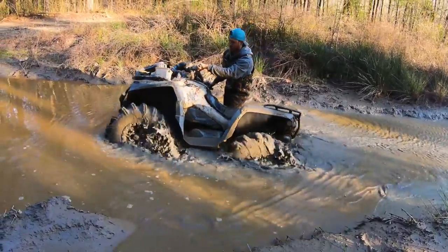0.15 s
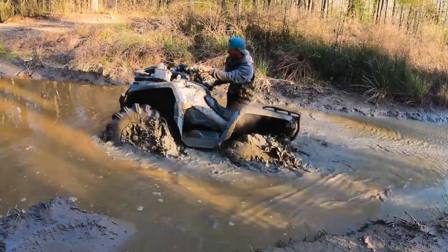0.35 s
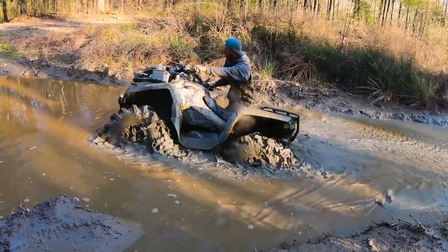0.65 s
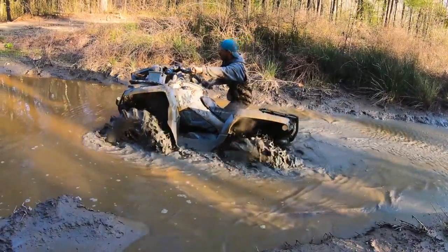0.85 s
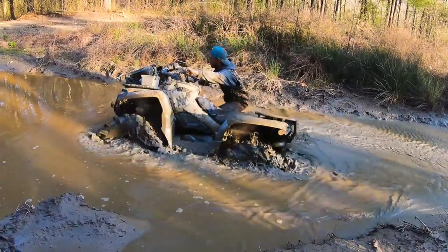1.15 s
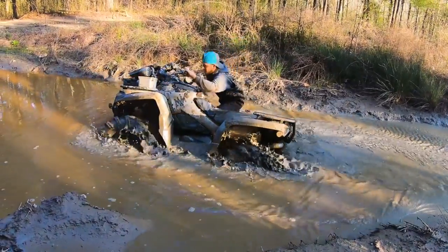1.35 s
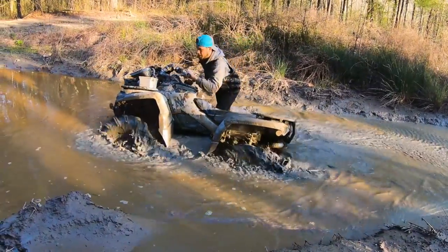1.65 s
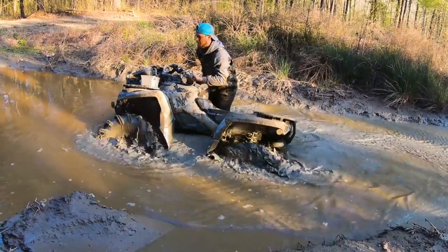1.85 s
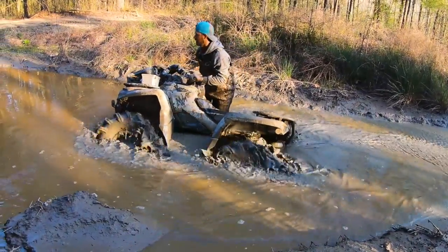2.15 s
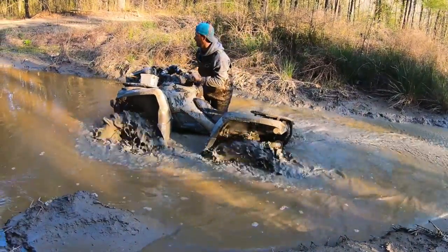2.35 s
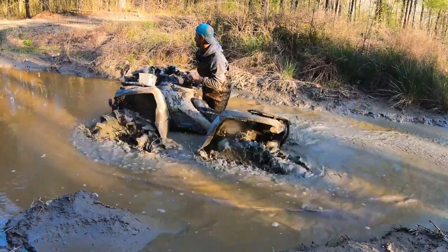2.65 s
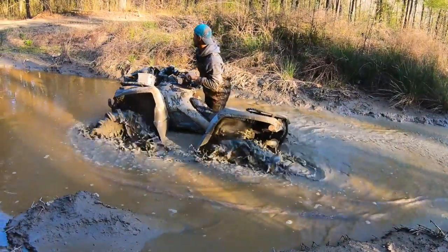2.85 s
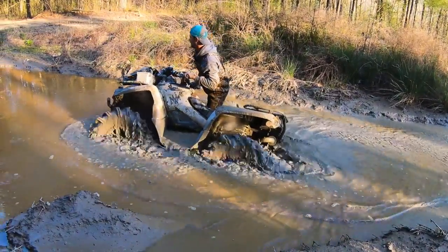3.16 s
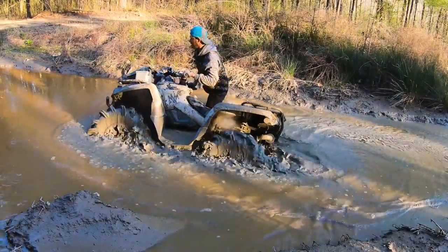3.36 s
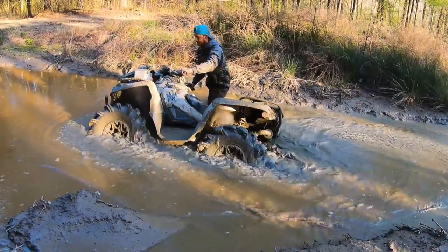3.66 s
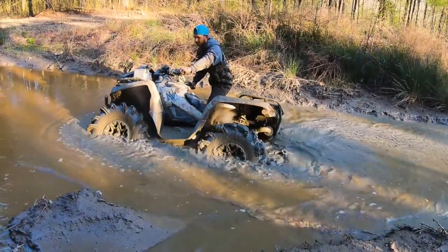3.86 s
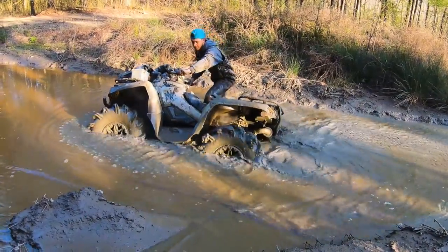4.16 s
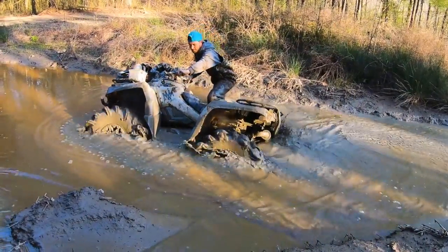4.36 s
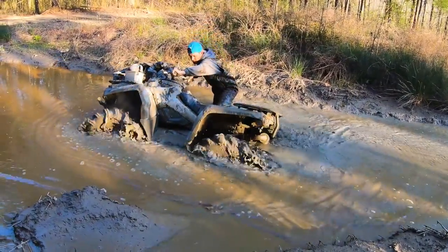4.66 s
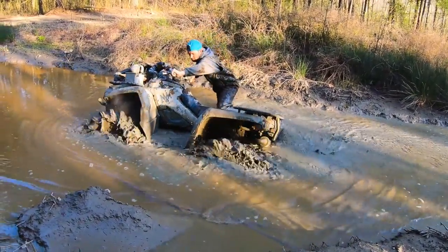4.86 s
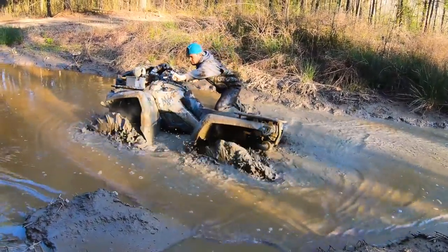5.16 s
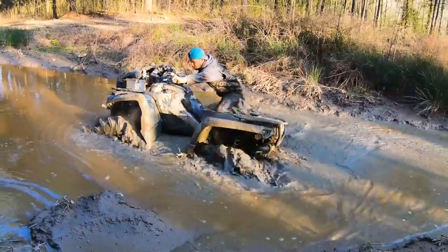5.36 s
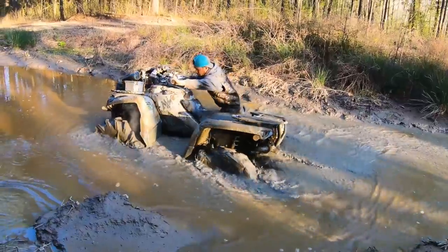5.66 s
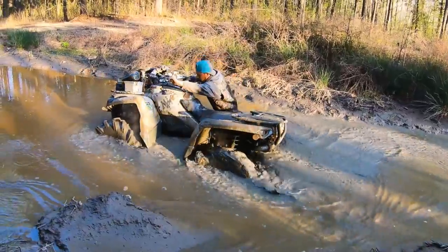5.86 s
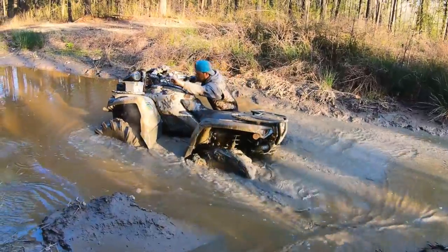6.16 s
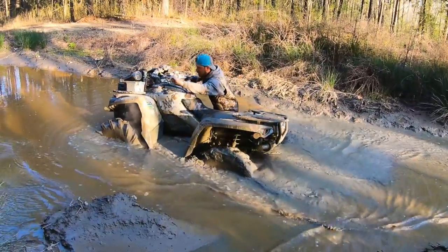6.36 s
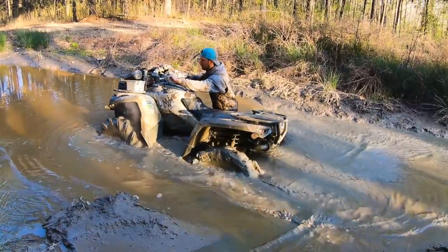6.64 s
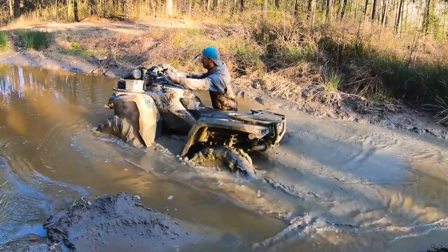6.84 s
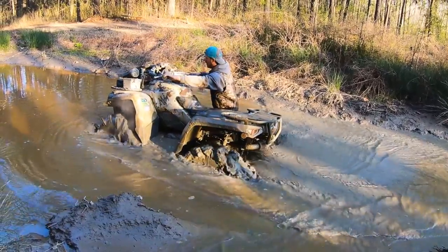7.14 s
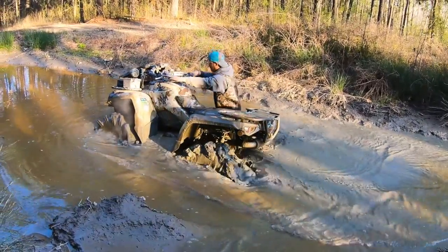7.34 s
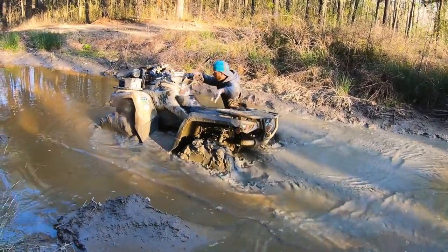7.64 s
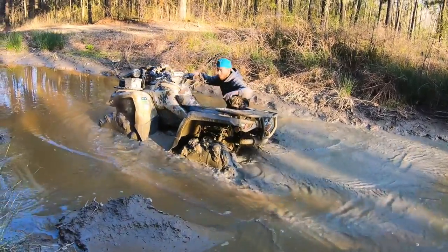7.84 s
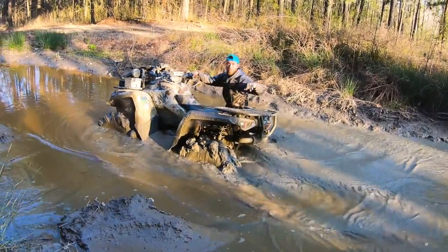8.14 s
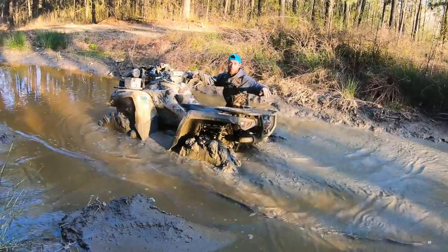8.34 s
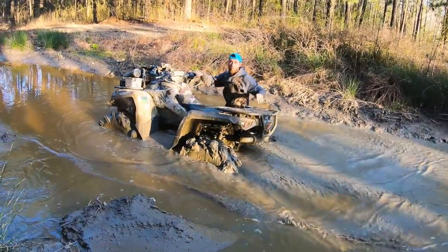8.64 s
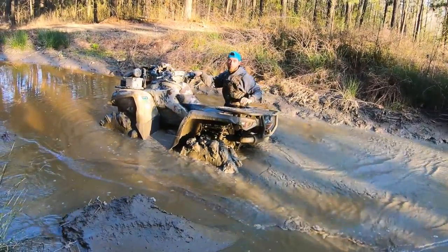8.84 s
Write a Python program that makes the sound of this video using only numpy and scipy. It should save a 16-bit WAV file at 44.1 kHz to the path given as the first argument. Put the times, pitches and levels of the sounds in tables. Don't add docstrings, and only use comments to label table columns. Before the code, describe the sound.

A low, fluttering engine labours in deep mud, its speed surging and sagging. Wet churning and fine spray continue beneath. Three bouts of staccato exhaust pops burst out, first ringing and hollow, later sharper and spitting, with bubbles bursting at the pipe. Between them the sound drops to underwater thuds. Another engine putters steadily nearby. It ends slow, deep and gurgling, heard close through a small two-channel microphone outdoors.

```python
import sys
import numpy as np
from scipy import signal
from scipy.fft import rfft, irfft, next_fast_len
from scipy.io import wavfile
from scipy.ndimage import uniform_filter1d

SR = 44100
rng = np.random.default_rng(int(sys.argv[2]) if len(sys.argv) > 2 else 0)


def natural_amplitude(level_db):
    exponent = np.asarray(level_db, float) / 20
    return 10 ** exponent


def persist_wave(psi):
    counts = np.round(np.clip(psi, -1, 1) * 32767).astype(np.int16)
    wavfile.write(sys.argv[1], SR, np.atleast_2d(counts).T)


N = 396900
TIME = np.arange(N) / SR

# start in seconds, firings per second.
REVS = [(0, 29.5), (1.4, 31), (1.65, 17), (2.0, 28), (2.4, 35.5), (2.9, 18), (3.4, 15), (3.7, 26),
        (4.1, 23), (4.4, 27.5), (5.2, 28), (5.5, 16), (6.2, 18.5), (6.45, 24), (6.68, 21), (6.92, 28),
        (7.3, 19), (8.1, 13.3)]
# time in seconds, lift of the pipe's upper modes in dB,
# first mode of the mud hollow in Hz, its second mode in Hz.
WATERLINE = [(0, 6.5, 325, 500), (.5, 6.5, 324, 452), (.75, 8, 319, 494), (1.05, -4.5, 367, 517),
             (1.2, -2, 346, 522), (1.4, -7, 337, 520), (1.85, 3.5, 390, 500), (1.95, 3, 397, 602),
             (2.1, -3, 393, 602), (2.22, 5.5, 330, 490), (2.3, 19, 333, 475), (2.4, 19.5, 415, 495),
             (2.6, 9, 382, 505), (3, 9, 328, 500), (3.9, 6, 402, 540), (4, 15, 430, 547),
             (4.15, 12.5, 336, 547), (4.35, 2.5, 320, 662), (4.5, 1, 394, 640), (4.7, 6.5, 410, 498),
             (4.9, -4.5, 367, 506), (5.2, 1, 332, 496), (6, 0, 379, 539), (7, -4, 359, 541),
             (9, -5.5, 289, 458)]
# time in seconds, third pipe mode in Hz, first tailpipe mode in Hz,
# tailpipe ring over the pop in dB.
FILL = [(0, 213.6, 780, -11), (.5, 225, 790, -9), (1.05, 195.5, 800, -22), (1.4, 188, 814, -16),
        (1.85, 213, 793, -11), (1.98, 211, 738, -7.5), (2.2, 169.5, 750, -12), (2.32, 190, 794, -7),
        (2.45, 207, 784, -14), (3.2, 209, 796, -16), (4, 219, 790, -19.5), (4.4, 225, 800, -13),
        (4.8, 198, 802, -7), (5.2, 198, 830, -10), (5.8, 215, 780, -16), (6.3, 224, 780, -17.5),
        (6.7, 206, 781, -12.5), (7, 206, 747, -11.5), (7.4, 216, 780, -19), (9, 206, 780, -20)]


def level(x, db):
    return x * natural_amplitude(db) / np.sqrt(np.mean(x ** 2))


def curves(table):
    s, *columns = np.transpose(table)
    return [np.interp(TIME, s, c) for c in columns]


def on_log(hz, table):
    f, v = np.transpose(table)
    return np.interp(np.log(hz + 1), np.log(f + 1), v)


def band(x, lo_hz, hi_hz):
    sos = signal.butter(2, [lo_hz, min(hi_hz, .45 * SR)], "band", fs=SR, output="sos")
    return signal.sosfilt(sos, x)


def walk(rate_hz):
    hold = int(SR / rate_hz)
    steps = np.repeat(rng.standard_normal(N // hold + 1), hold)
    return 1.73 * uniform_filter1d(uniform_filter1d(steps, hold), hold)[:N]


def ring(modes, rise_s, detune=0., scatter_db=0., size=5500):
    t = np.float32(TIME[:size])
    hz, t60_s, db, polarity = np.transpose(modes)[:, :, None]
    decay = np.exp(np.float32(-np.log(1000) / t60_s) * t)
    swing = np.sin(np.float32(2 * np.pi * hz * (1 + detune)) * t) * decay
    fade = np.minimum(4 - 4 * t / t[-1], 1)
    return (polarity * natural_amplitude(db + scatter_db))[:, 0] @ swing * (1 - np.exp(-t / rise_s)) * fade


def add(out, s, sound):
    i = max(int(s * SR), 0)
    out[..., i:i + sound.shape[-1]] += sound[..., :max(N - i, 0)]


def pop_times():
    # time in seconds, then pop, hollow ring, crack
    # and spit in dB.
    single_pops = [(0.15, -21.5, -22, -25, -52), (0.222, -33, -23.5, -29, -47), (0.333, -24, -31, -28, -49),
                   (0.388, -16.5, -20.5, -37, -48), (0.42, -23.5, -19, -32, -60),
                   (0.452, -16, -26, -33, -52), (0.594, -29, -36, -53, -58), (0.753, -25.5, -32, -40, -48),
                   (0.917, -22, -29, -36, -41), (1.077, -12, -20, -42, -50), (1.109, -12.5, -12.5, -47, -49),
                   (1.142, -14, -17, -46, -54), (1.174, -26.5, -18, -27.5, -46),
                   (1.207, -9, -12.5, -37, -57), (1.239, -11.5, -11, -41, -63),
                   (1.271, -10, -13.5, -46, -63), (1.304, -12, -25, -30, -45), (1.335, -11, -15, -25.5, -58),
                   (1.366, -16.5, -9, -39, -54), (1.403, -20, -26.5, -46, -49), (1.839, -9.5, -22, -19, -48),
                   (1.882, -11, -14, -28, -60), (1.931, -11.5, -13, -25.5, -38.5),
                   (1.96, -8, -11.5, -50, -59), (1.996, -9, -19, -25, -55), (2.032, -10, -16, -23, -45),
                   (2.067, -15, -31, -26, -46), (2.135, -17.5, -37, -37, -53), (2.165, -17, -40, -43, -54),
                   (2.201, -22, -22, -34, -43), (2.23, -14, -19.5, -42, -56), (2.259, -26.5, -25, -47, -63),
                   (2.29, -23.5, -22, -37, -50), (2.321, -17.5, -22, -31, -52),
                   (2.349, -16.5, -24, -28.5, -47), (2.377, -17, -15.5, -25, -62),
                   (2.406, -13, -15.5, -25, -61), (2.434, -17, -20.5, -27.5, -49),
                   (2.547, -29, -35, -38, -54), (2.6, -17, -22, -29, -52),
                   (3.993, -21.5, -23.5, -29, -45), (4.047, -14.5, -27, -49, -49),
                   (4.081, -7.5, -15, -50, -54), (4.13, -13, -20.5, -26, -40),
                   (4.348, -17.5, -19, -26.5, -50), (4.383, -24.5, -26, -23, -49),
                   (4.416, -16.5, -37, -28, -45), (4.452, -11.5, -31, -51, -57),
                   (4.494, -15, -24.5, -35, -56), (4.521, -24, -32, -40, -51),
                   (4.624, -14.5, -32, -31, -49), (4.659, -20.5, -24.5, -25, -45),
                   (4.694, -19, -21.5, -33, -50), (4.73, -18, -26, -55, -54),
                   (4.766, -17.5, -30.5, -47, -57), (4.799, -23.5, -40, -36, -43.5),
                   (4.836, -18, -36, -40, -50), (4.869, -19.5, -36, -37, -53),
                   (4.906, -16, -20.5, -28, -59), (4.941, -13.5, -18.5, -32.5, -50),
                   (4.976, -15.5, -26, -32, -45), (5.012, -23, -22.5, -33, -48),
                   (5.047, -18.5, -16.5, -26, -48), (5.083, -13, -15, -43, -48),
                   (5.119, -11, -14, -42.5, -57), (5.155, -15, -18, -41, -47), (5.23, -21.5, -30, -30, -51),
                   (5.285, -29, -26, -26, -43), (5.496, -28, -29.5, -22, -43), (5.553, -38, -26, -41, -46),
                   (5.798, -6.5, -31, -30.5, -40.5), (5.855, -5, -21, -28.5, -39.5),
                 (5.903, -6.5, -19.5, -20, -43), (6.002, -41, -30, -61, -50),
                 (6.045, -12, -16.5, -26.5, -51), (6.1, -27.5, -34, -39, -50), (6.158, -30, -33, -38, -47),
                 (6.222, -39, -40, -36, -46), (6.266, -7.5, -24, -25, -38), (6.319, -9.5, -18, -23.5, -43),
                 (6.366, -7, -24, -24, -40), (6.41, -7.5, -29, -21.5, -44),
                 (6.452, -9.5, -18.5, -25.5, -39.5), (6.543, -28, -39, -38, -47),
                 (6.587, -24.5, -33, -28, -43.5), (6.642, -25, -44, -38, -44),
                 (6.679, -9, -23.5, -19.5, -38.5), (6.726, -7, -25, -21.5, -39.5),
                 (6.768, -8, -36, -22.5, -44), (6.809, -7.5, -33, -19, -50), (6.848, -9, -29, -23, -40),
                 (6.886, -6.5, -31, -20.5, -49), (6.922, -7, -29, -21.5, -41), (6.958, -12, -27, -32, -54),
                 (7.002, -21, -28.5, -41, -41), (7.038, -21, -31, -29, -45),
                 (7.081, -20, -31, -28.5, -40.5), (7.124, -22.5, -32, -25.5, -40),
                 (7.17, -22, -31, -22, -40.5), (7.216, -24, -33, -29, -44), (7.27, -28.5, -44, -31, -42.5),
                 (7.327, -33, -46, -30.5, -47), (7.376, -7, -24.5, -22, -35.5),
                 (7.425, -8, -33, -27.5, -41), (7.48, -35, -41, -33, -48.5),
                 (7.535, -24, -26, -25.5, -43.5), (7.57, -9.5, -17, -33.5, -41),
                 (7.634, -27, -30, -27.5, -42.5), (7.688, -24.5, -52, -35, -38.5),
                 (7.752, -27, -35, -23, -36.5), (7.816, -25, -38, -24, -39), (7.864, -17.5, -18, -40, -45)]
    # first and last pop in seconds, first and last pop in dB, spit in dB.
    faint_runs = [
        (7.953, 8.006, -39, -25, -48),
        (8.225, 8.595, -35, -33, -49.5),
        (8.672, 8.981, -36.5, -33, -50),
    ]
    hollow_over_pop_db, crack_over_spit_db = 2.5, -6
    turns = np.cumsum(curves(REVS)[0]) / SR
    rows = [tuple(r) for r in (*single_pops,)]
    for first_s, last_s, first_db, last_db, spit_db in faint_runs:
        ends = np.interp([first_s, last_s], TIME, turns)
        count = int(np.round(ends[1] - ends[0])) + 1
        when = np.interp(np.linspace(*ends, count), turns, TIME)
        for s, db in zip(when, np.linspace(first_db, last_db, count)):
            rows.append((s, db, db + hollow_over_pop_db, spit_db + crack_over_spit_db, spit_db))
    return np.array(sorted(rows))


def firings():
    anchors = np.r_[0, pop_times()[:, 0], N / SR]
    gaps = np.diff(anchors)
    rate_hz = np.interp(anchors[:-1] + gaps / 2, *np.transpose(REVS))
    counts = np.maximum(np.round(gaps * rate_hz), 1).astype(int)
    times = np.concatenate([s + g * np.arange(n) / n for s, g, n in zip(anchors, gaps, counts)])
    return signal.savgol_filter(times, 5, 2)


def clear_of_water():
    full_db, range_db, hold_s = -13.5, 12, 0.036
    s, db = pop_times().T[:2]
    share = np.clip(1.5 + (db - full_db) / range_db, 0, 1)
    coarse = TIME[::SR // 100]
    near = share[:, None] * np.exp(-((coarse - s[:, None]) / hold_s) ** 2)
    return np.interp(TIME, coarse, near.max(axis=0))


def drowned_exhaust(times, clear):
    # Hz, t60 in seconds, level in dB, polarity.
    glug_modes = [(58.3, 0.26, -3, 1), (86.6, 0.36, -11.5, 0.094)]
    # Hz, t60 in seconds, level in dB, polarity.
    pipe_modes = [(123.1, 0.099, 0.5, 0.92), (158.4, 0.055, 3.5, 0.89), (216.8, 0.11, -2, 0.54),
                  (266.8, 0.047, -12, -0.49)]
    # time in seconds, shift as a share of its pitch.
    glug_sag = [(6.6, -0.0055), (7.2, -0.15), (9, -0.1)]
    # time in seconds, pipe thump in dB.
    load = [(0, -21), (.2, -16), (.55, -28.5), (.85, -16), (1.2, -21.5), (1.65, -22), (2.3, -19.5),
            (2.9, -26), (3.25, -20.5), (3.75, -21.5), (4.2, -19), (5.4, -24.5), (5.9, -21), (6.2, -22.5),
            (7.1, -21), (7.8, -24), (8.5, -15), (9, -16)]
    # time in seconds, glug in dB.
    sunk = [(0, -19), (.35, -30), (1, -28), (1.8, -26), (2.3, -30), (2.7, -36), (3.6, -24), (4.2, -27),
            (4.8, -25), (5.3, -27), (5.8, -22), (6.2, -20), (6.8, -23), (7.3, -24), (7.6, -22.5),
            (8.3, -22), (8.6, -19.5), (9, -26)]
    # time in seconds, churn in dB.
    stirred = [(0, -32.5), (.8, -33), (1.2, -28.5), (1.6, -35), (2.2, -29), (2.7, -31.5), (3.1, -32.5),
               (3.6, -34.5), (4.3, -32), (4.8, -37), (5.3, -31), (6, -30.5), (6.8, -32.5), (7.3, -34.5),
               (8, -31.5), (8.5, -31.5), (9, -30.5)]
    glug, pipe, stir = np.zeros((3, N))
    lift_db = np.interp(times, *np.transpose(WATERLINE)[:2])
    t = np.arange(4000) / SR
    puff = np.exp(-t / 0.01) * (1 - np.exp(-t / 0.00039)) * (1 - t / t[-1])
    upper = np.array([[0], [.5], [1], [1]])
    draws = rng.standard_normal((len(times), 14))
    for s, period_s, lift, c in zip(times, np.gradient(times), lift_db, draws):
        rough = np.clip(period_s / .04 - 1, .1, .6)
        start = s + .002 * rough * c[12]
        sag = np.interp(s, *np.transpose(glug_sag)) + .015 * c[:2, None]
        add(glug, start + .002, ring(glug_modes, .016, sag, 1.5 * c[2:4, None], size=6000))
        detune, scatter_db = .012 * c[4:8, None], (.8 + 2 * rough) * c[8:12, None]
        detune[2] += np.interp(s, *np.transpose(FILL)[:2]) / pipe_modes[2][0] - 1
        add(pipe, start + 0.0017, ring(pipe_modes, 0.0063, detune, scatter_db + lift * upper, size=3000))
        add(stir, start, natural_amplitude(3.0 * c[13]) * puff)
    glug, pipe = [x / np.sqrt(uniform_filter1d(x ** 2, SR // 3) + 1e-4) for x in (glug, pipe)]
    glug_db = curves(sunk)[0] - 7.5 * clear + 2 * walk(5.4)
    pipe_db = curves(load)[0] + 10.5 * clear
    churn = level((0.54 + stir) * band(rng.standard_normal(N), 200.5, 357.6), 0)
    return glug * natural_amplitude(glug_db - 2.5) + churn * natural_amplitude(curves(stirred)[0]) + pipe * natural_amplitude(pipe_db - 4.5)


def pops():
    # delay in seconds, level in dB.
    bounces = [
        (0, 0),
        (.0028, -14),
        (.0092, -5.5),
        (.0125, -13),
    ]
    # Hz, t60 in seconds, level in dB, polarity.
    tail_modes = [(780, 0.11, 3, 0.44), (647, 0.1, -2, -0.33), (1130, 0.036, -16, 0.12),
                  (1143, 0.054, -2, 0.52), (1520, 0.11, -2, -0.48), (1680, 0.033, -6, 0.73),
                  (2290, 0.11, -7.5, -0.73), (2920, 0.061, -8.5, 1)]
    out, t = np.zeros((2, N)), np.arange(3001) / SR
    noise = rng.standard_normal((3, 2, N))
    dull = band(noise[0], 390, 925)
    wet = band(noise[1], 1400, 3040)
    high = 1.07 * band(band(noise[2], 2000, 10200), 1500, 9500)
    splat, slap, spit = np.zeros((3, N))
    splat_shape = (1 - np.exp(-t / 0.00055)) * (np.exp(-t / 0.009) + 0.25 * np.exp(-t / 0.035))
    slap_shape = (1 - np.exp(-t / 0.00022)) ** 2 * np.exp(-t / 0.0056)
    spit_shape = (t / 0.0053) ** 2 * np.exp(2 - t / 0.0021)
    spit_shape = spit_shape + 0.4 * (1 - np.exp(-t / 0.0048)) * np.exp(-t / 0.011)
    when, _, first_hz, second_hz = np.transpose(WATERLINE)
    filled, _, tail_hz, tail_db = np.transpose(FILL)
    rows = pop_times()
    for (s, db, hollow_db, crack_db, spit_db), c in zip(rows, rng.standard_normal((len(rows), 16))):
        mouth_hz = np.clip(1450 * 2 ** ((crack_db - db + 10.0) / 14), 650, 1900)
        for k, (late_s, loss_db) in enumerate(bounces):
            u = np.pi * mouth_hz * .95 ** k * (t[:300] - .0019)
            swing = (2 * u ** 2 - 1 - 2.14 * u) * np.exp(-u ** 2)
            uneven_db = 0.95 * c[4 + k] * (k > 0)
            add(out, s + late_s * (1 + .025 * c[k]), natural_amplitude(db - 5.5 + loss_db + uneven_db) * swing)

        detune = .012 * c[8:, None]
        hollow = [(np.interp(s, when, first_hz), .07, 3.5, 1), (np.interp(s, when, second_hz), .065, -2.5, -1)]
        hollow_ring = ring(hollow, 0.0066, detune[:2], c[7:9, None], size=2800)
        add(out, s + 0.0017, natural_amplitude(hollow_db + 5.0) * hollow_ring)

        dull_db = -9 * np.log2(np.maximum(np.array(tail_modes)[:, :1] / mouth_hz, 1))
        tail = [(np.interp(s, filled, tail_hz), *tail_modes[0][1:]), *tail_modes[1:]]
        tail_ring = ring(tail, 0.0027, detune, dull_db + 2 * c[:8, None], size=2200)
        add(out, s + 0.002017, natural_amplitude(db + np.interp(s, filled, tail_db)) * tail_ring)

        add(splat, s + 0.0011, natural_amplitude(db + 2.0) * splat_shape)
        add(slap, s + 0.002, natural_amplitude(crack_db + 6) * slap_shape)
        add(spit, s + 0.0007, natural_amplitude(spit_db + 7.5) * spit_shape)
    low_mix = np.array([[.8, 0.072], [.8, -0.31]])
    high_mix = np.array([[.7, 0.69], [.7, -0.19]])
    return out + low_mix @ (splat * dull + slap * wet) + high_mix @ (spit * high)


def blips():
    # time in seconds, Hz, level in dB.
    bubbles = [(1.931, 4950, -31), (1.928, 7050, -42), (5.8, 5717, -35), (5.801, 1600, -25.5),
               (6.32, 2400, -27), (6.62, 2500, -38), (7.69, 3600, -35), (7.752, 2910, -29.5),
               (7.753, 865, -25), (7.815, 1720, -30), (7.816, 3160, -32), (7.868, 1760, -38)]
    out, t = np.zeros(N), np.arange(1500) / SR
    for s, hz, db in bubbles:
        decay_cycles = 18.3 * (hz / 3000) ** 0.99
        envelope = np.exp(-t * hz / decay_cycles) * (1 - np.exp(-t / 0.001))
        add(out, s + 0.0023, natural_amplitude(db) * np.sin(2 * np.pi * hz * t * (1 + 2.6 * t)) * envelope)
    return out


def water(times):
    # time in seconds, spray in dB.
    churned = [(0, -50.5), (.6, -51), (1.3, -51.5), (2, -53), (2.5, -52.5), (2.7, -49.5), (2.95, -50),
               (3.15, -50), (3.4, -54), (3.8, -57), (4.3, -53.5), (4.9, -52), (5.2, -52.5), (5.5, -52.5),
               (5.8, -58), (7, -57.5), (7.9, -59), (8.5, -58.5), (9, -57.5)]
    # Hz, density in dB per Hz.
    wash = [(260, -28), (450, -1), (549, -2.5), (696, 1.5), (1350, 0), (1560, -5), (1760, -4.5), (3030, -7),
            (4160, -18), (8720, -25), (10600, -22.5), (13800, -87.5), (16000, -86)]
    # Hz, correlation.
    port_like = [(300, 0.57), (540, 0.96), (1130, 0.09), (2350, 0.66), (4900, 0.67), (10200, 0.093)]
    # time in seconds, ring of its cover over the slosh in dB, Hz.
    belt_strain = [(0, -5.5, 1480), (.6, -8.5, 1571), (.9, -12, 1538), (2.4, -12, 1560), (2.75, -6.5, 1481),
                   (3.1, -14, 1497), (3.55, -13, 1520), (3.9, -13, 1517), (5, -18, 1516), (5.7, -14, 1533),
                   (9, -20, 1547)]
    spray_db = curves(churned)[0]
    slosh_db = np.minimum(spray_db + 15.5, -37)
    pulse = np.zeros(N)
    for s, c in zip(times, rng.standard_normal(len(times))):
        add(pulse, s, natural_amplitude(2 * c) * np.hanning(900))
    stir = natural_amplitude(0.88 * walk(30)) * (1 + 0.27 * pulse)
    slosh, spray = 0, 0
    for hz in 450 * 2 ** np.arange(0, 5.2, 1 / 3):
        like = np.clip(on_log(hz, port_like), 0, 1)
        mid, side = band(rng.standard_normal((2, N)), hz / 1.214, hz * 1.075)
        pair = np.sqrt(1 + like) * mid + np.sqrt(1 - like) * side * np.array([[1], [-1]])
        pair = pair * natural_amplitude(on_log(hz, wash) + 1.1 * walk(16))
        spray_share = np.clip(np.log2(hz / 2800), 0, 1)
        bright_db = 0.58 * (spray_db + 53.5) * np.clip(np.log2(hz / 1200), 0, 1)
        slosh = slosh + (1 - spray_share) * pair * natural_amplitude(bright_db)
        spray = spray + spray_share * pair
    belt_db, belt_hz = curves(belt_strain)
    low_pass = signal.butter(2, 90, fs=SR, output="sos")
    flutter = signal.sosfilt(low_pass, rng.standard_normal((2, N)))
    phase = 2 * np.pi * np.cumsum(belt_hz) / SR
    belt = level(flutter[0] * np.cos(phase) + flutter[1] * np.sin(phase), 0) * natural_amplitude(belt_db)
    wet = (level(slosh, 0) + belt) * natural_amplitude(slosh_db) + level(spray, 1.47) * natural_amplitude(spray_db)
    return stir * wet + drips(slosh_db)


def drips(slosh_db):
    out, t = np.zeros(N), np.arange(600) / SR
    for place, pitch, size in rng.random((250, 3)):
        hz = 1200 * 7 ** pitch
        envelope = np.exp(-t * hz / 6) * (1 - np.exp(-t / .0005))
        add(out, place * N / SR, natural_amplitude(12 * size) * np.sin(2 * np.pi * hz * t * (1 + 12 * t)) * envelope)
    return out * natural_amplitude(slosh_db - 3.0)


def idling_twin():
    # time in seconds, lateness of the cycle in ms.
    idle = [(0, 23.6), (.75, 30.4), (1.249, 48.4), (1.501, 40.7), (2.25, 52.5), (2.5, 33.7), (3.25, 28),
            (3.749, 41), (4.0, 32), (4.3, 36.1), (5.1, 34.4), (5.8, 38.8), (6.25, 30.8), (6.75, 36.8),
            (7.001, 50.2), (8.101, 58), (8.55, 57.5), (9.0, 51)]
    # Hz, t60 in seconds, level in dB, polarity.
    silencer = [(67.06, 0.15, -2, -0.76), (96.2, 0.53, -15.5, 0.72), (142, 0.052, 8, 1),
                (191, 0.29, -14.5, 0.69)]
    cycle_hz, gain = 11.95, natural_amplitude(3.47)
    s, late_ms = np.transpose(idle)
    out, beats = np.zeros(N), np.arange(int(N / SR * cycle_hz) + 1) / cycle_hz
    for beat, c in zip(beats, rng.standard_normal((len(beats), 12))):
        start = beat + np.interp(beat + 0.034, s, late_ms) / 1000 + 0.01581
        strong = ring(silencer, 0.027, 0.044 * c[:4, None], 0.98 * c[4:8, None])
        weak = natural_amplitude(-8.0 + 1.65 * c[9]) * ring(silencer, 0.022, 0.027 * c[:4, None])
        add(out, start, gain * strong)
        add(out, start + .031 + 0.001 * c[8], gain * weak)
    return out


def scene():
    times, clear = firings(), clear_of_water()
    burst = pops() + blips()
    t = np.arange(SR // 5) / SR
    banks = rng.standard_normal((2, len(t))) * np.exp(-t / 0.016) * (t > .012)
    smear = signal.fftconvolve(burst, banks, axes=1)[:, :N] * natural_amplitude(-36.5)
    idle = idling_twin() * natural_amplitude(-2 * clear)
    return idle + drowned_exhaust(times, clear) + burst + smear + water(times)


def band_limit(x):
    return signal.sosfilt(signal.butter(12, 15950, fs=SR, output="sos"), x)


def record(dry):
    # Hz, dB.
    port_db = [(60, -.8), (200, -.9), (330, -1.5), (590, -5), (1040, -7.5), (1840, -4.5), (4500, -4.5),
               (8000, -14), (10000, -11), (11500, -2)]
    # Hz, radians.
    port_lead = [(300, 0), (600, -.4), (1300, .7), (2300, .1), (4200, .1), (5500, -1.3), (9000, -1.2)]
    edge = SR // 20
    size = next_fast_len(N + 2 * edge)
    hz = np.arange(size // 2 + 1) * SR / size
    half = natural_amplitude(on_log(hz, port_db) / 2) * np.exp(.5j * on_log(hz, port_lead))
    padded = np.pad(dry, ((0, 0), (edge, edge)), "reflect", reflect_type="odd")
    ports = irfft(rfft(padded, size) * np.array([half, 1 / half]), size)[:, edge:edge + N]
    return band_limit(np.tanh(0.78 * ports) / 0.89)


dry = scene()
out = record(dry)
persist_wave(out)
```